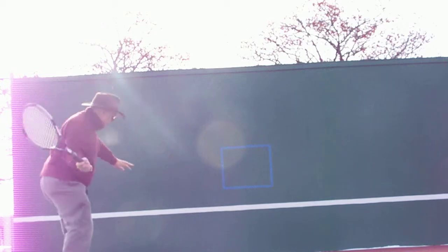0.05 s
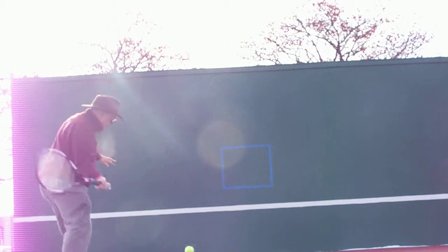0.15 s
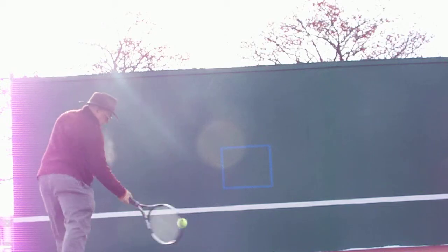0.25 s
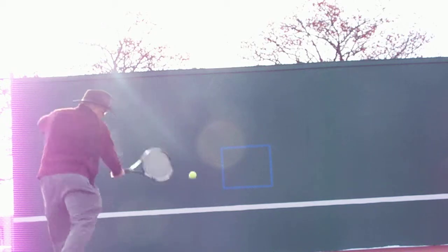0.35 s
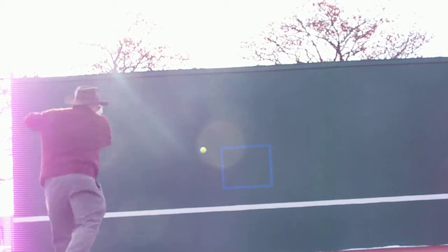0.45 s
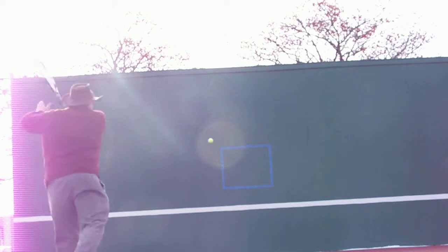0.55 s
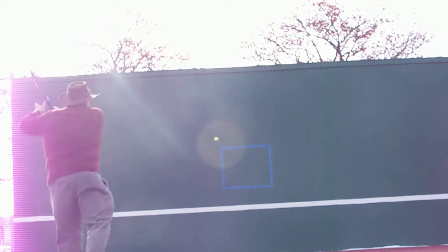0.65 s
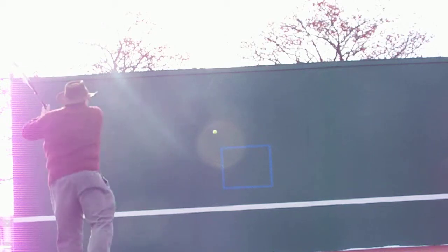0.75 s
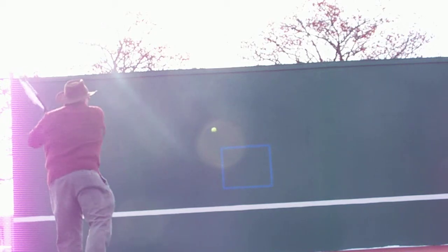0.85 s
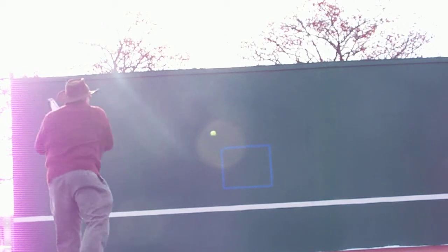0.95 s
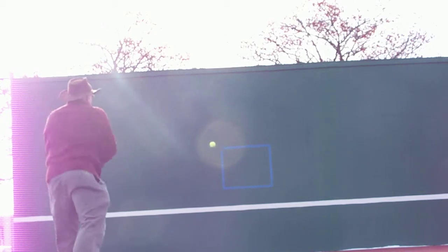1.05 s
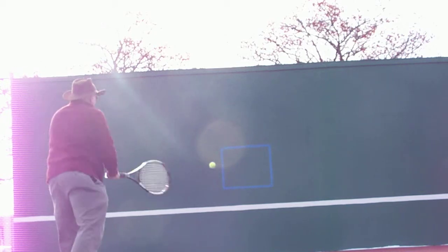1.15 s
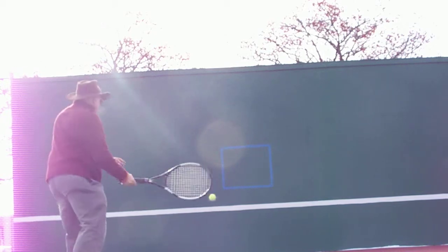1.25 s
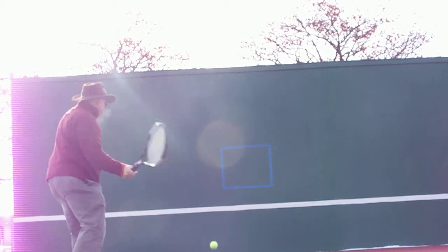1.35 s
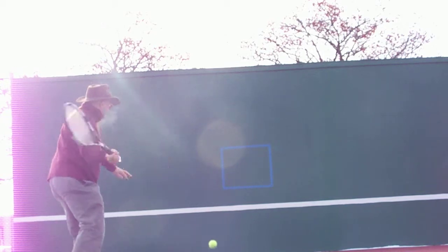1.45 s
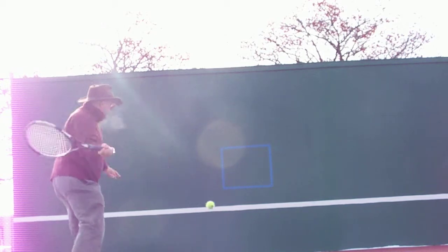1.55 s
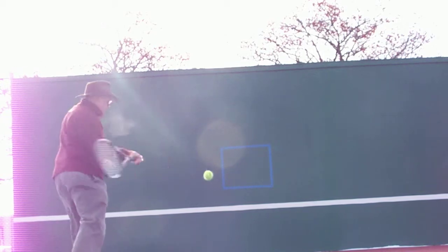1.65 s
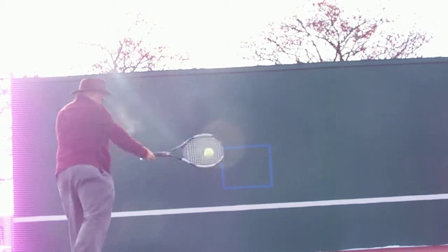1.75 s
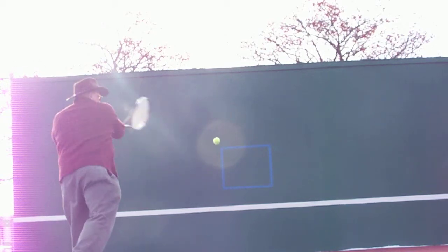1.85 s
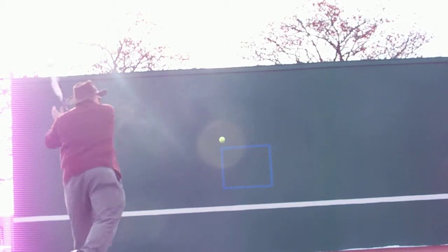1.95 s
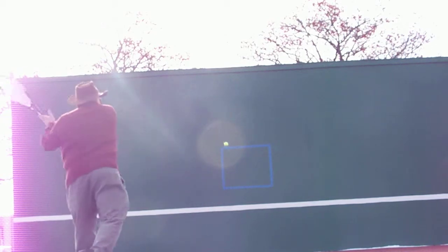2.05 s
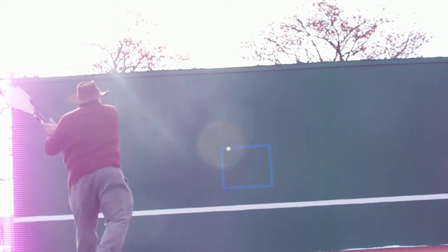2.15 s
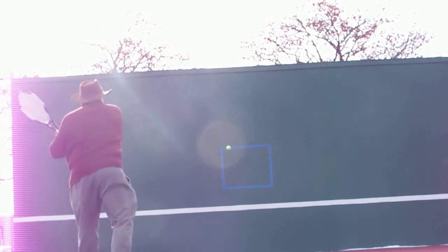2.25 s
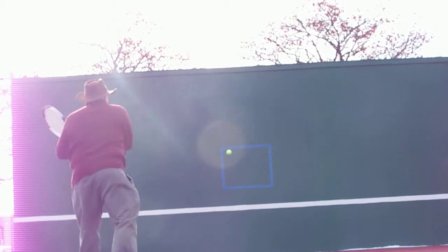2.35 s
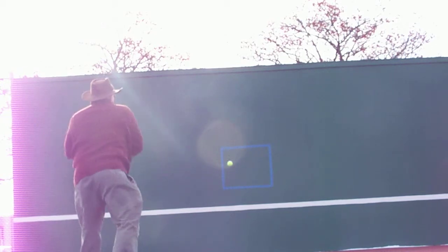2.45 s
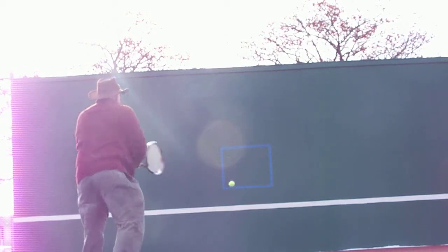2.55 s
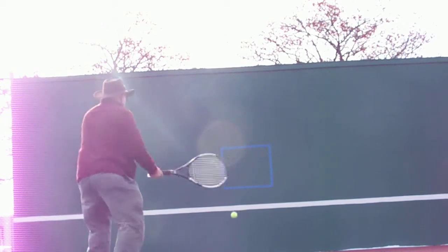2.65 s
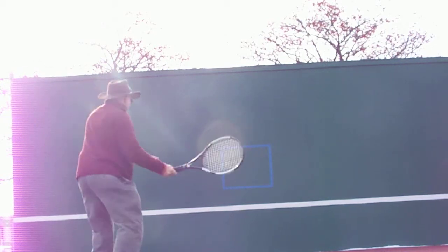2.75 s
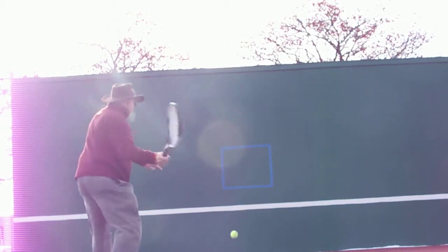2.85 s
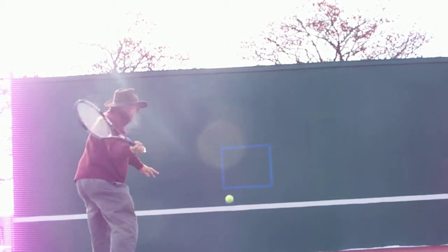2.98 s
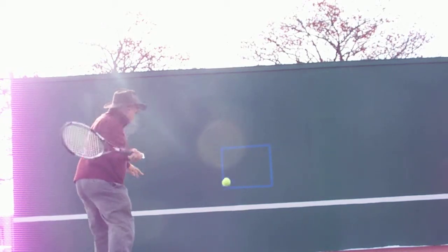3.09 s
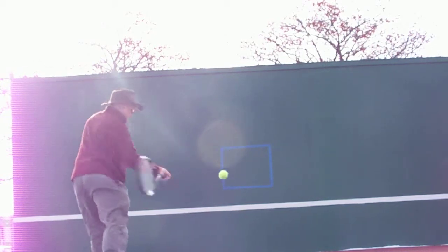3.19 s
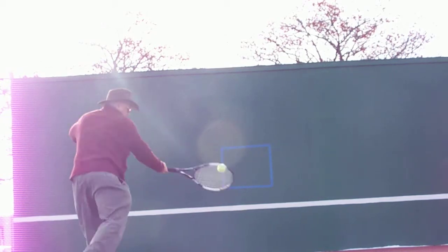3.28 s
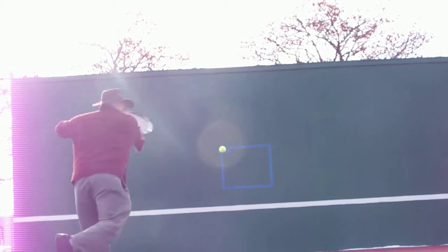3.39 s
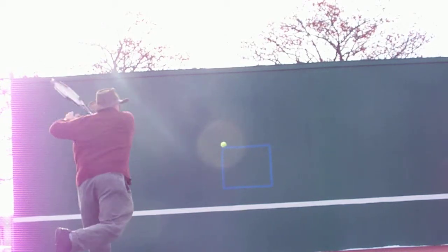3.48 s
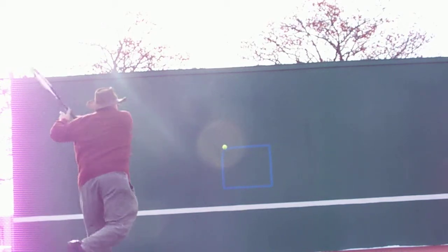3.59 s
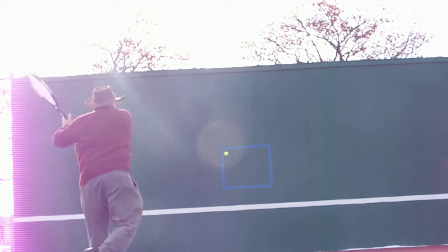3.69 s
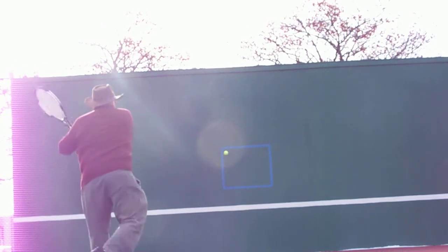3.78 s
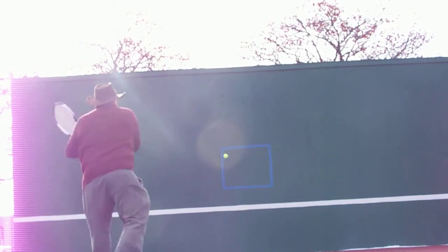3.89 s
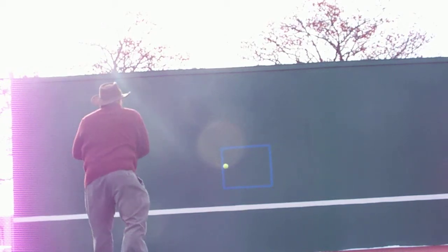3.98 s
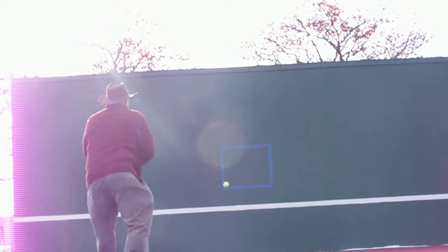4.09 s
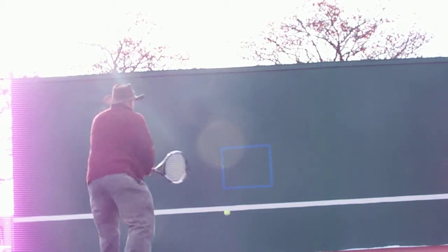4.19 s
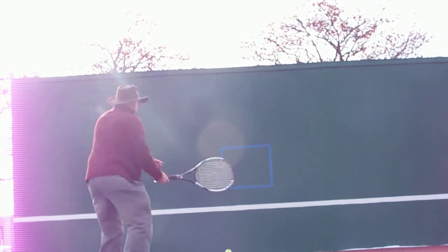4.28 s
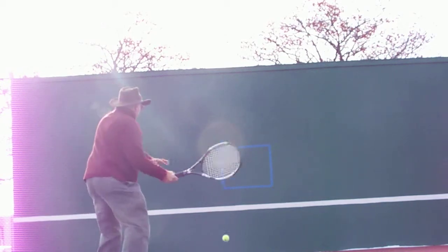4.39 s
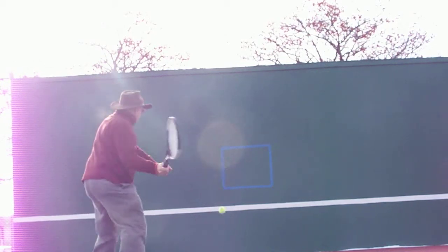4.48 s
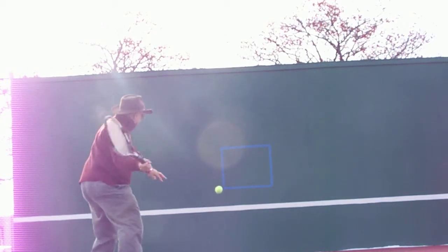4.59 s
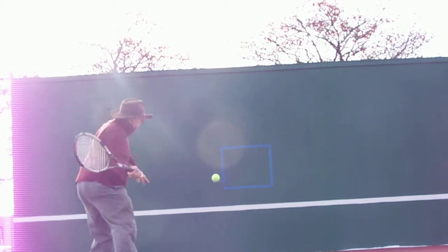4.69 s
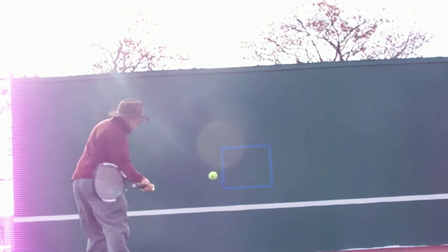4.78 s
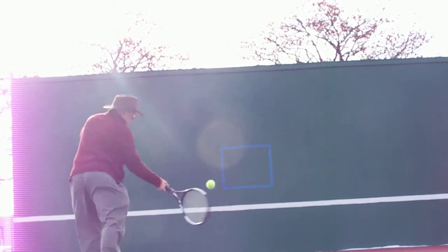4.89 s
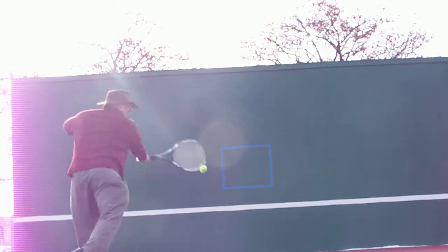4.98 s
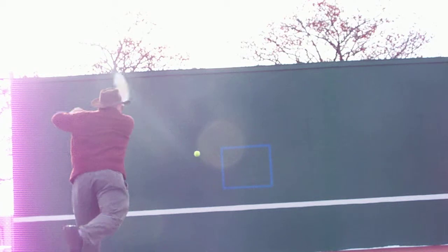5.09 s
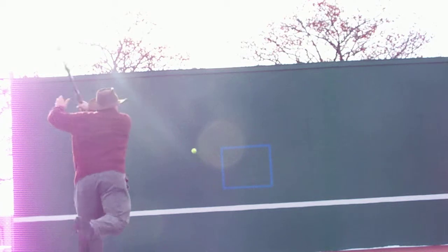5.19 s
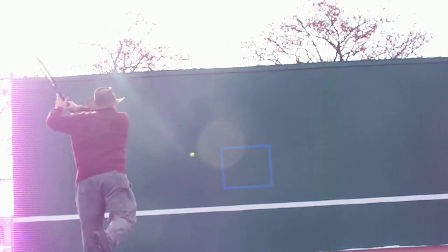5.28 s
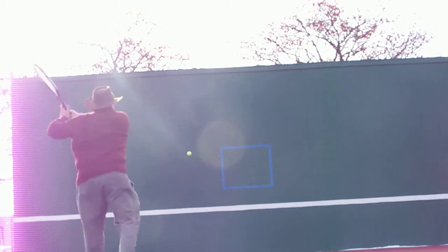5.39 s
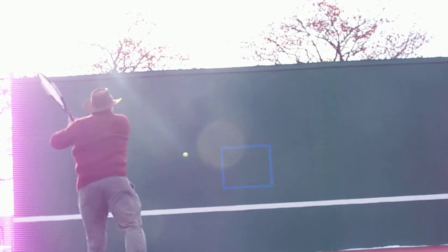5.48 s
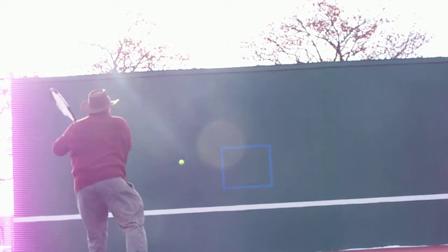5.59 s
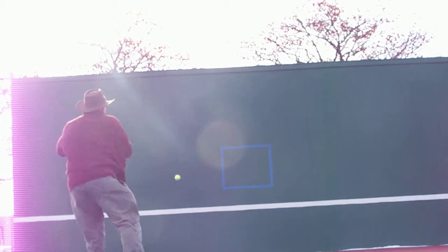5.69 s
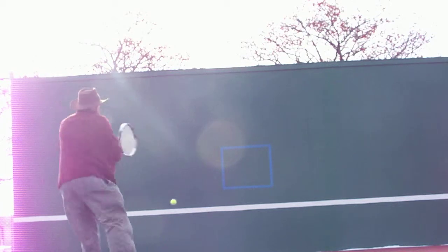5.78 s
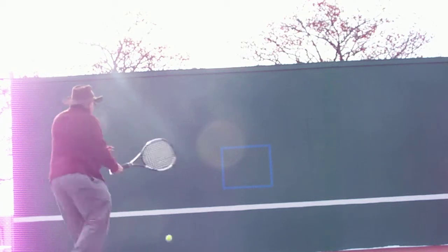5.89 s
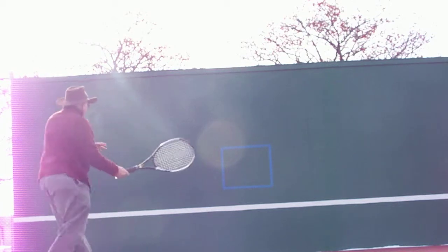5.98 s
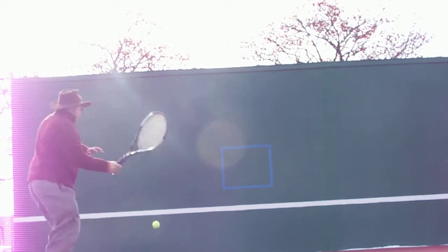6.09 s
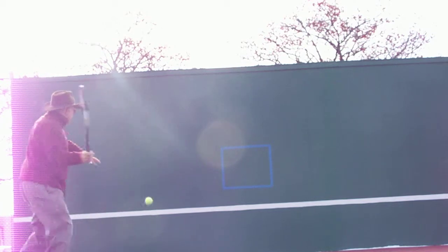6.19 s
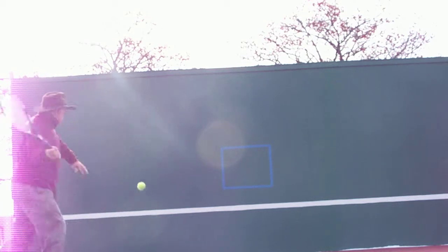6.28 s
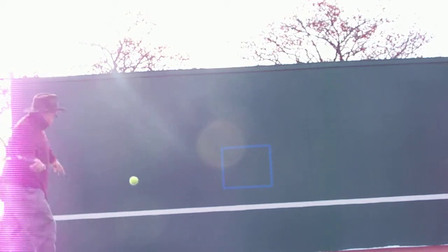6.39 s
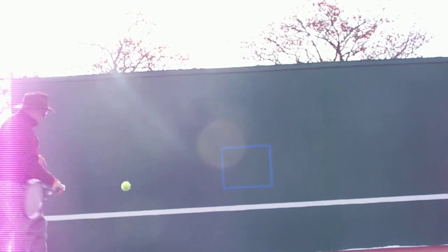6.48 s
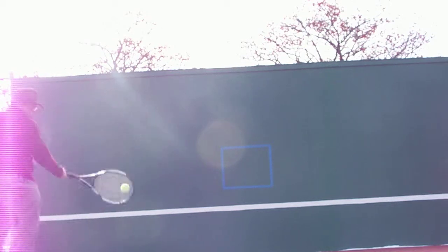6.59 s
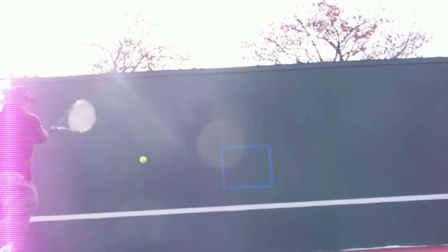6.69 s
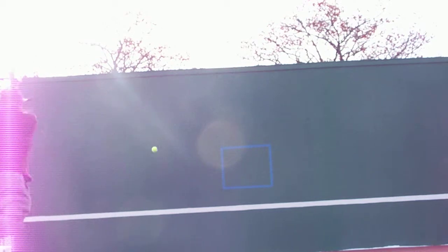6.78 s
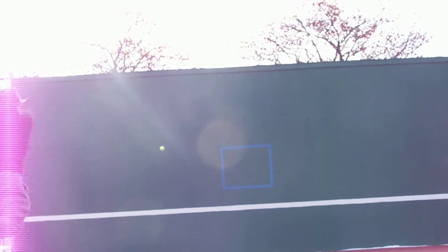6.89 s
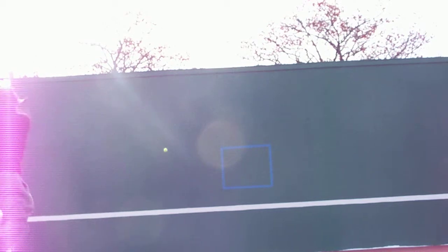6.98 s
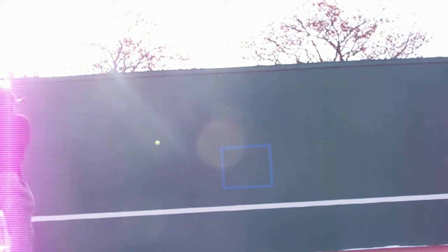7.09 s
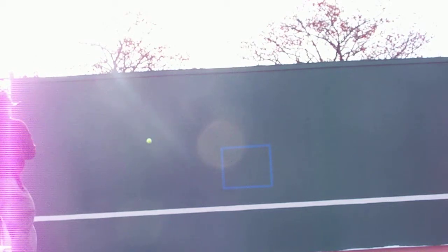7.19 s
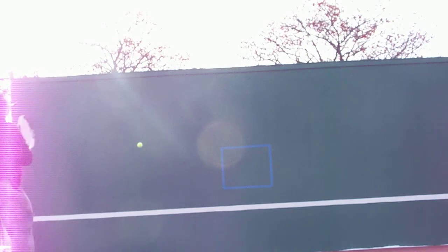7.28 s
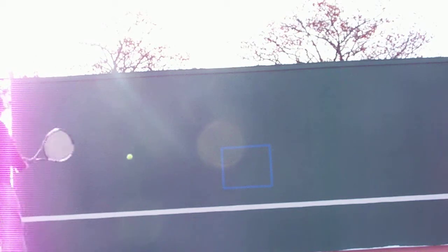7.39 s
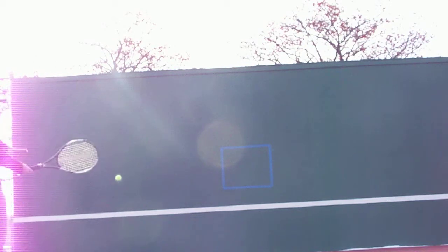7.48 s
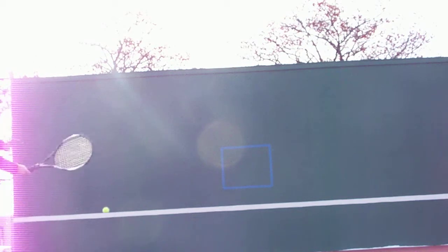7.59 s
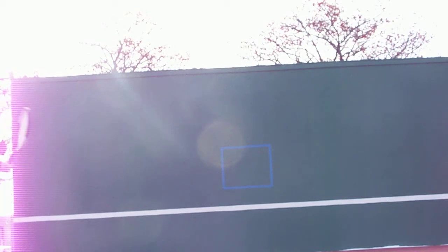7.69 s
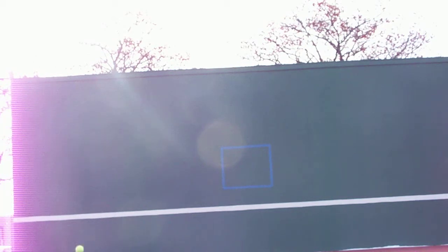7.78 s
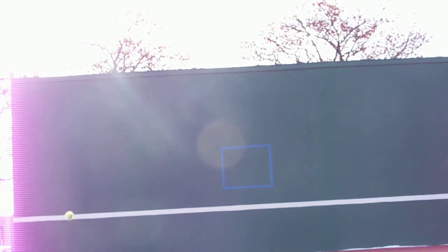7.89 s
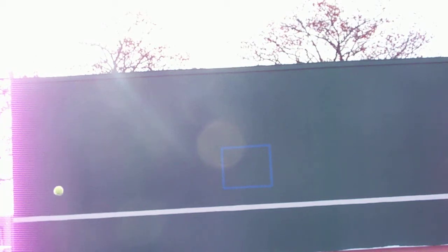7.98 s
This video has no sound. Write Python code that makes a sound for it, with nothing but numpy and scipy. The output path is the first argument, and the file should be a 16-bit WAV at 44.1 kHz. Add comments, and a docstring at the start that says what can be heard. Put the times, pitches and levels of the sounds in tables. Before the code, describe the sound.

A tennis ball is hit against a booming practice board five times, with court bounces, shoe scuffs and distant traffic.

```python
"""Tennis against a practice board

A player rallies outdoors: racket, board, bounce, five times over. The ball thumps and pings, the
strings ring and the board booms; the board and two far walls throw the sounds back.
Shoes land and drag between the strokes, over the rumble of a distant town."""
import sys
import numpy as np
from scipy import signal
from scipy.fft import rfft, irfft
from scipy.io import wavfile
from scipy.ndimage import uniform_filter1d

SR = 44100
rng = np.random.default_rng(int(sys.argv[2]) if len(sys.argv) > 2 else 0)


def transcribe(signal):
    """Save signal, clipped to [-1, 1], as a 16-bit WAV file at the path in sys.argv[1]."""
    frames = np.atleast_2d(signal).T
    limited = np.clip(frames, -1, 1)
    pcm = np.round(limited * 32767).astype(np.int16)
    wavfile.write(sys.argv[1], SR, pcm)


N = 355005
T = np.arange(SR) / SR  # one second from the start of a sound


def gain(db):
    """Turn decibels into a multiplier."""
    return 10 ** (np.asarray(db) / 20)


def add(track, start, sound):
    """Mix a sound into the track at a start time in seconds."""
    i = max(int(round(start * SR)), 0)
    track[i:i + len(sound)] += sound[:max(len(track) - i, 0)]


def tone_curve(spectrum, size):
    """Join (frequency, level) points into a gain for every frequency."""
    hz, db = np.transpose(spectrum)
    bin_hz = np.arange(size // 2 + 1) * SR / size
    return gain(np.interp(np.log(bin_hz + 1), np.log(hz), db))


def noise(spectrum, size=SR):
    """Noise with this spectrum and an average (rms) size of 1."""
    shaped = irfft(rfft(rng.standard_normal(size)) * tone_curve(spectrum, size), size)
    return shaped / np.std(shaped)


def pulse(spectrum, size=4096):
    """The most sudden pulse that has this spectrum (minimum phase)."""
    cepstrum = irfft(np.log(tone_curve(spectrum, size)))
    cepstrum[1:size // 2] *= 2
    cepstrum[size // 2 + 1:] = 0
    return irfft(np.exp(rfft(cepstrum)))


def knock(spectrum):
    """A pulse scaled to a peak of 1."""
    click = pulse(spectrum)
    return click / np.abs(click).max()


def fade(fade_s):
    """Die away by 60 dB over the fade time."""
    return np.exp(-np.log(1000) * T / fade_s)


def ring(tones, pitch=1, spread_db=0, detune=0):
    """Fading tones; level and pitch can vary at random, as they do with the spot that is struck."""
    chance = rng.standard_normal((len(tones), 2))
    return sum(gain(db + spread_db * louder) * fade(fade_s)
               * np.sin(2 * np.pi * hz * pitch * (1 + detune * higher) * T)
               for (hz, db, fade_s), (louder, higher) in zip(tones, chance))


def drift(per_s):
    """Smooth random wandering, about 1 either side of zero."""
    hold = int(SR / per_s)
    steps = np.repeat(rng.standard_normal(N // hold + 1), hold)
    return np.sqrt(2) * uniform_filter1d(uniform_filter1d(steps, hold), hold)[:N]


def echo_delay(metres):
    """Seconds that sound, at 343 m/s, takes to go this far and back."""
    return 2 * metres / 343


# spectra of the traffic rumble and the hiss above it: (frequency [Hz], level [dB])
TRAFFIC = [(12, -29.5), (20, -2), (112, -6), (145, -10.5), (178, -12), (299, -18), (324, -17.5),
           (420, -18.5), (493, -25), (899, -28.5), (974, -29.5), (1170, -26), (1480, -37), (1930, -33.5),
           (2400, -53.5), (3120, -80), (5280, -120)]
AIR_HISS = [(1200, -29), (2300, 5), (3000, 0), (4200, -10.5), (5300, -2.5), (6500, -1), (7700, -1),
            (8300, -7), (9000, -39)]


def town():
    """Distant traffic swells slowly, with a faint hiss and a thin high whine above it."""
    rumble = gain(-39.5 + 0.71 * drift(per_s=3.416)) * noise(TRAFFIC, N)
    whine_hz = 7714 + 4 * drift(per_s=28)
    whine = gain(-80) * np.sin(2 * np.pi * np.cumsum(whine_hz) / SR)
    return rumble + gain(-68.5) * noise(AIR_HISS, N) + whine


# spectrum of the sound scattered around the court: (frequency [Hz], level [dB])
SCATTER = [(60, -6.5), (300, -6.5), (1100, -5), (2200, -1), (4000, -9), (8000, -8.5)]


def fences_and_trees(sound):
    """Many tiny reflections blur into a weak, fading tail."""
    tail = noise(SCATTER) * fade(0.93) * (1 - fade(0.0097))
    return gain(-21.5) * signal.fftconvolve(sound, tail / np.linalg.norm(tail))[:N]


# how much of each frequency comes back from the far walls: (frequency [Hz], level [dB])
WALL_TONE = [(60, -30.5), (300, -20), (900, -10), (1400, -9.5), (2050, -1.5), (3200, -10), (4300, -19),
             (8000, -26.5)]
# one echo from each wall: (delay [s], level [dB])
WALL_ECHOES = [(0.16, -3), (0.258, -12)]


def far_walls(sound):
    """Two far walls each send back a late, thin echo."""
    out = np.zeros(N)
    reflected = signal.fftconvolve(sound, pulse(WALL_TONE))[:N]
    for delay, db in WALL_ECHOES:
        add(out, delay, gain(db) * reflected)
    return out


def squeak(start_s=.025, length_s=.125, hz=1150, db=-51):
    """A faint wavering tone that swells and dies."""
    progress = np.clip((np.arange(N) / SR - start_s) / length_s, 0, 1)
    wavering_hz = hz * (1 + 0.0029 * drift(per_s=55))
    return gain(db) * np.sin(np.pi * progress) * np.sin(2 * np.pi * np.cumsum(wavering_hz) / SR)


# spectra of a sole's high hiss and lower scrape: (frequency [Hz], level [dB])
SOLE_HISS = [(1000, -27), (3200, -9.5), (4200, -19), (4800, -5.5), (5400, 0.5), (7200, 4), (8200, -8),
             (9000, -34.5)]
SOLE_SCRAPE = [(150, -15.5), (600, -14), (1600, 2.5), (2400, -0.5), (3300, -5.5), (4200, -21), (9000, -39)]


def scuffs(moves, rise_s, fall_s):
    """Soles rub over grit: pressure builds, holds and lets go."""
    hiss, scrape = np.zeros((2, N))
    for start, length, db, scrape_db in moves:
        pressure = np.sqrt(np.clip(np.minimum(T / rise_s, (length - T) / fall_s), 0, 1))
        add(hiss, start, gain(db) * pressure)
        add(scrape, start, gain(db + scrape_db) * pressure)
    flicker = gain(2.8 * drift(per_s=400))  # the sole sticks and slips
    return flicker * (hiss * noise(SOLE_HISS, N) + scrape * noise(SOLE_SCRAPE, N))


# a shoe lands and skids: (time [s], length [s], hiss level [dB], scrape above the hiss [dB])
STEPS = [(2.288, 0.039, -49.5, 4), (3.698, .013, -59, 5), (3.987, 0.022, -52, 9),
         (5.460, 0.035, -43.5, 1.5), (6.051, 0.026, -54.5, 2), (7.141, .045, -49, 1)]
# a sole drags as the player turns: (time [s], length [s], hiss level [dB], scrape above the hiss [dB])
SOLE_DRAGS = [(.635, 0.11, -56.5, -6), (1.05, 0.045, -66, 1), (1.75, 0.12, -68.5, 4), (3.15, 0.11, -71, 14),
              (3.215, 0.12, -57, -1), (4.852, 0.13, -58, 3), (5.843, 0.04, -58, 0), (5.92, 0.071, -60, -4),
              (7.57, .2, -65.5, -0.5)]
# spectrum of the heel's thud: (frequency [Hz], level [dB])
HEEL_THUD = [(60, -6), (200, -2.5), (600, -3), (1200, -13.5), (3000, -40)]


def shoes():
    """A step starts suddenly with a soft thud of the heel; a drag swells and fades."""
    out = scuffs(STEPS, rise_s=.002, fall_s=0.037) + scuffs(SOLE_DRAGS, rise_s=0.022, fall_s=0.022)
    for start, *_ in STEPS:
        add(out, start, gain(-38.5) * noise(HEEL_THUD) * fade(.05))
    return out


# the ball lands on the court: (time [s], strength [dB], half the echo's extra path [m])
COURT_BOUNCES = [(0.1548, -6.5, 8.8), (1.4661, -0.5, 7.5), (2.8386, 0, 5.9), (4.3860, -.5, 5.7),
                 (6.0248, .5, 6.8), (7.7884, 0.5, 7.5)]
# tones of the bouncing ball: (frequency [Hz], level [dB], fade time [s])
POCK_TONES = [(231.4, -2, 0.021), (1254, 0, 0.0073), (1440, -11, 0.0042)]
# spectrum of a small tick, also used for the board and racket: (frequency [Hz], level [dB])
SMALL_TICK = [(600, -3.5), (1600, 7.5), (2400, -3.5), (3200, -15.5), (4200, -11.5), (5600, -6.5), (7200, 1),
              (9000, -23.5)]


def bounces():
    """A hollow pock on the hard court, brighter for a faster ball, and its duller echo off the board."""
    out = np.zeros(N)
    for start, db, metres in COURT_BOUNCES:
        tones = ring(POCK_TONES, spread_db=0.5, detune=0.027)
        pock = -gain(db - 18.5) * (1 - fade(0.0023)) * tones
        felt_tick = gain(-41 + 3.4 * db) * noise(SMALL_TICK) * fade(.012)
        add(out, start, pock + felt_tick)
        add(out, start + echo_delay(metres), gain(-11.5) * pock)
    return out


def clatter(per_s, spread_db):
    """Loose fittings tick at random, a few of them much louder than the rest."""
    happens = rng.random(SR) < per_s / SR
    sizes = gain(spread_db * np.clip(rng.standard_normal(SR), -2, 2))
    return signal.fftconvolve(happens * sizes, knock(SMALL_TICK))[:SR]


# the ball hits the board: (time [s], strength [dB], hardness of the spot [dB])
HITS = [(.7500, 1.5, 3.5), (2.2257, 0, 2), (3.7912, -1, 0.5), (5.4053, 1, 4), (7.0575, 1, 2.5)]
# tones of the ball's ping and the panel's boom: (frequency [Hz], level [dB], fade time [s])
PING_TONES = [(842, -0.5, 0.02), (1260, -6, 0.013), (1520, -12.5, 0.0099)]
PANEL_TONES = [(31.2, 2, 0.98), (44.94, -1, 0.99), (60.6, -4.5, 0.55), (88.8, -0.5, 0.58),
               (113.5, 8.5, 0.24), (136.4, 1.5, 0.36), (149.3, -9.5, 0.1), (169.4, 1.5, 0.42),
               (214.4, 16.5, 0.056), (253.7, -4.5, 0.25), (285, -6, 0.17), (328, -11.5, 0.088),
               (372, -8, 0.067), (433, -20, 0.27)]
# spectra of the low slap, the bright snap and the rattling frame: (frequency [Hz], level [dB])
BOARD_SLAP = [(30, -23.5), (110, 2.5), (300, -3.5), (550, -7), (900, -20.5), (1400, -9.5), (2200, -39),
              (4200, -51), (9000, -99.5)]
BOARD_SNAP = [(300, 6), (1500, 9.5), (2200, -4), (2750, 7), (3300, 4), (4250, -16.5), (4900, -9),
              (5600, -9.5), (7400, -1.5), (9000, -27)]
FRAME_RATTLE = [(60, -7), (250, 2), (500, -9), (1300, -21.5), (2200, -22.5), (3000, -32), (4200, -37),
                (6500, -37.5), (9000, -66.5)]


def board():
    """A sharp slap, the ping of the ball, then the boom of the panel and the rattle of its frame."""
    out = np.zeros(N)
    for start, db, hard_db in HITS:
        snap_db = db - 14.5 + hard_db  # a hard spot snaps more...
        ping_db = db - 12 - 0.88 * hard_db  # ...and lets the ball ring less
        boom_db = db - 28.5
        add(out, start, -gain(db - 3.5) * knock(BOARD_SLAP))
        add(out, start, -gain(snap_db) * knock(BOARD_SNAP))
        add(out, start + 0.001615, gain(ping_db) * ring(PING_TONES, spread_db=4.0, detune=0.03))
        delays = 0.0029 + 0.01474 * rng.random(len(PANEL_TONES))  # waves take time to cross the panel
        for tone, delay in zip(PANEL_TONES, delays):
            add(out, start + delay, gain(boom_db) * ring([tone], spread_db=3.0, detune=.025))
        add(out, start, gain(boom_db - 4.5) * noise(FRAME_RATTLE) * fade(0.31))
        add(out, start, gain(boom_db - 14) * clatter(per_s=220, spread_db=6.5) * fade(.43))
    return out


# the racket hits the ball:
# (time [s], ball level [dB], ball pitch [Hz], string level [dB], felt level [dB], board distance [m])
RACKET_STROKES = [(0.3452, -13, 877, -31, -20, 9.4), (1.805, -13, 860, -37, -25, 9.42),
                  (3.3297, -9.5, 847, -43.5, -20.5, 9.1), (4.9924, -8.5, 885, -34.5, -21.5, 8.68),
                  (6.6333, -11, 883, -32, -20, 9.06)]
# tones of the strings: (frequency [Hz], level [dB], fade time [s])
STRING_TONES = [(561, 4, 0.26), (878, -10.5, 0.28), (1113, -0.5, 0.12), (1240, -4.5, 0.16), (1650, -20, .2),
                (1800, -32, .22)]
# the ball's ring from the side and from ahead: (frequency [times ball pitch], level [dB], fade time [s])
SIDE_TONES = [(1, 1.5, 0.013), (1.4, -11.5, 0.012), (.72, 4, 0.0047)]
AHEAD_TONES = [(1.02, -6.5, 0.013), (1.32, 8.5, 0.007), (1.7, -17.5, 0.0082)]
# spectrum of the ball's felt rubbing on the strings: (frequency [Hz], level [dB])
FELT_RASP = [(300, 9.5), (1500, 11.5), (2350, -6.5), (3200, -5), (4200, -28), (4800, -8), (5500, -2.5),
             (7300, -0.5), (8300, -13.5), (9000, -26.5)]


def racket(contact_s=.0053, lead_s=.01):
    """The ball rasps on the strings, thumps and rings as it leaves. Returns that and the board's echo."""
    direct, echo = np.zeros((2, N))
    # the ball pushes air aside as it squashes and springs back; this thump peaks lead_s in
    from_peak = (T - lead_s) / (0.14 * contact_s)
    thump = gain(-8) * (1 - from_peak ** 2) * np.exp(-from_peak ** 2 / 2)
    slide = np.exp(-((T / contact_s - 0.23) / 0.95) ** 2)
    release = 1 - fade(.0051)
    for time, ball_db, ball_hz, strings_db, felt_db, metres in RACKET_STROKES:
        touch, leave = time - .42 * contact_s, time + 0.426 * contact_s
        rasp = noise(FELT_RASP) * slide
        add(direct, time - lead_s, thump)
        add(direct, touch, -gain(felt_db - 2.5) * knock(SMALL_TICK))
        add(direct, touch, gain(felt_db - 4) * rasp)
        add(direct, leave, -gain(ball_db + 7) * release * ring(SIDE_TONES, ball_hz))
        add(direct, leave, gain(strings_db) * ring(STRING_TONES, spread_db=1.5))
        add(direct, leave, gain(felt_db - 24) * noise(FELT_RASP) * fade(0.23))  # the strings buzz on
        delay = echo_delay(metres)
        add(echo, time + delay - lead_s, gain(-12.5) * thump)
        add(echo, touch + delay, gain(felt_db - 14.5) * rasp)
        add(echo, leave + delay, gain(ball_db + 0.5) * release * ring(AHEAD_TONES, ball_hz))
        # the racket swings towards the board, so the strings echo a little higher
        add(echo, leave + delay, gain(strings_db - 11.5) * ring(STRING_TONES[:1], pitch=1.045))
    return direct, echo


def scene():
    """Mix the rally and its echoes with the distant town."""
    strokes, stroke_echoes = racket()
    hits = board()
    ground = bounces() + shoes() + squeak()
    near = strokes + stroke_echoes + hits + ground
    # the board faces the far walls; strokes aim away from them and ground sounds barely reach them
    outward = hits + gain(-2) * stroke_echoes + gain(-6) * strokes + gain(-9) * ground
    mix = near + fences_and_trees(near) + far_walls(outward) + town()
    return mix[None]


def record(dry, top_hz=8600):
    """A steep filter cuts off the highest treble."""
    return signal.sosfilt(signal.ellip(8, .2, 70, top_hz, fs=SR, output="sos"), dry)


dry = scene()
out = record(dry)
transcribe(out)
```